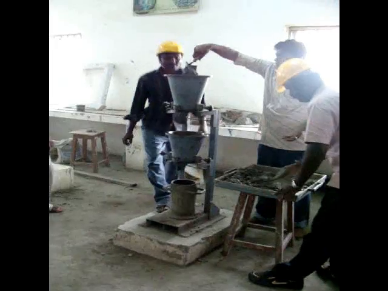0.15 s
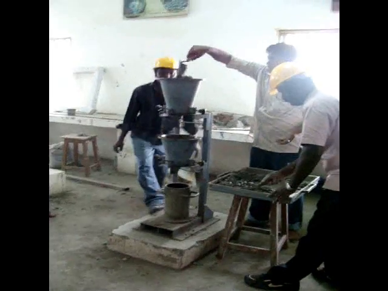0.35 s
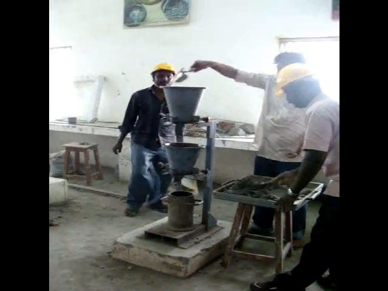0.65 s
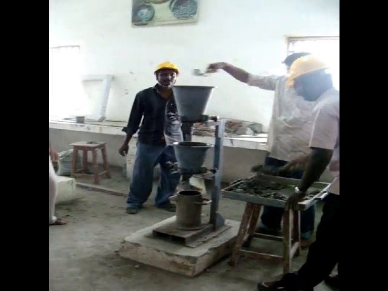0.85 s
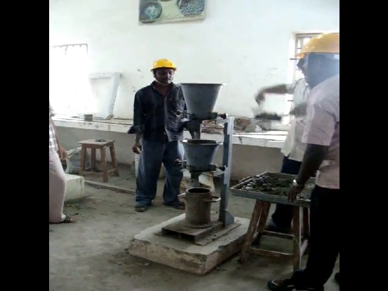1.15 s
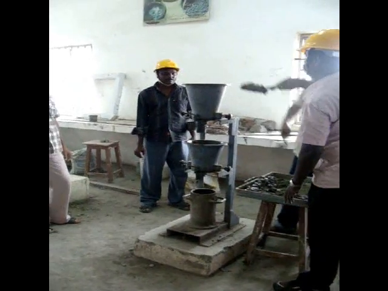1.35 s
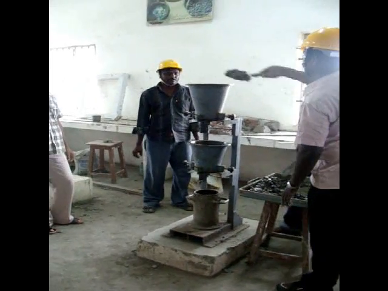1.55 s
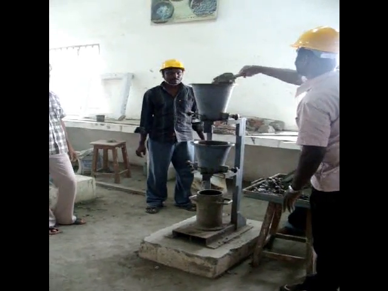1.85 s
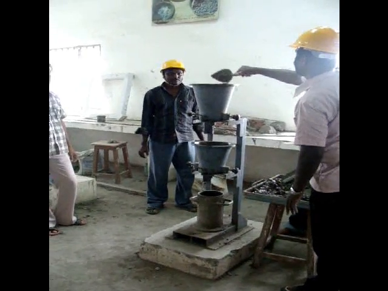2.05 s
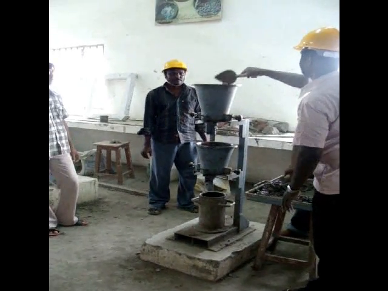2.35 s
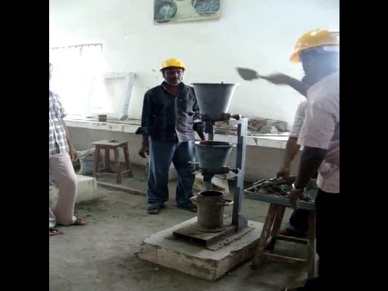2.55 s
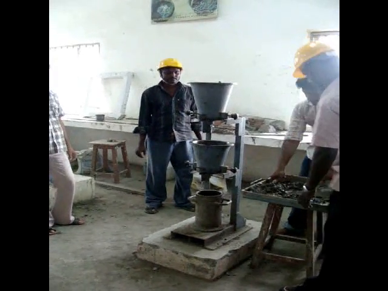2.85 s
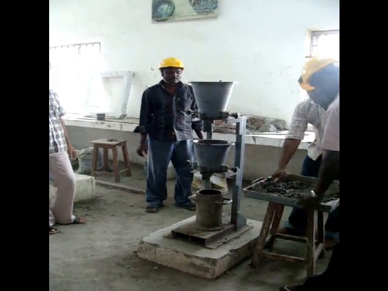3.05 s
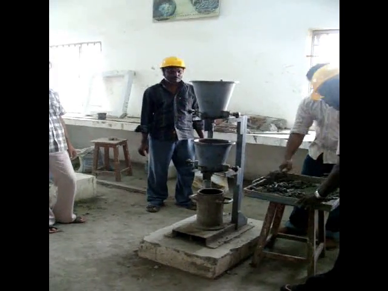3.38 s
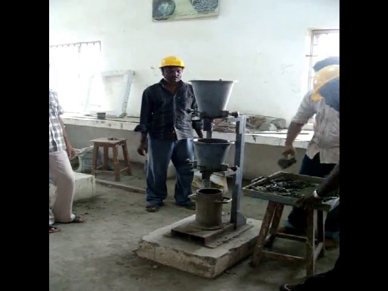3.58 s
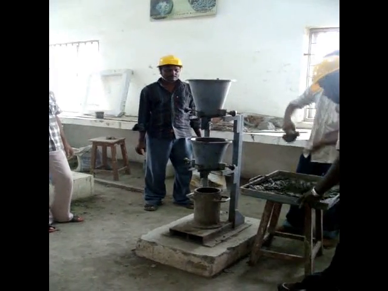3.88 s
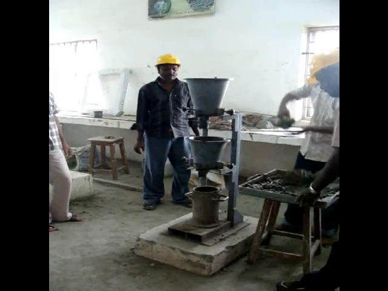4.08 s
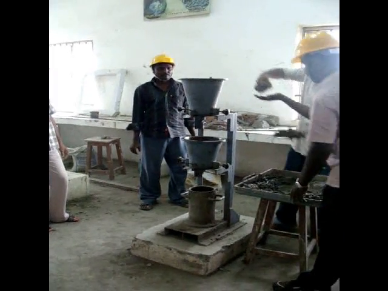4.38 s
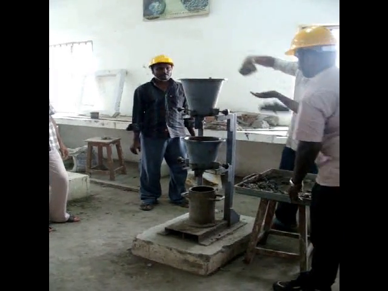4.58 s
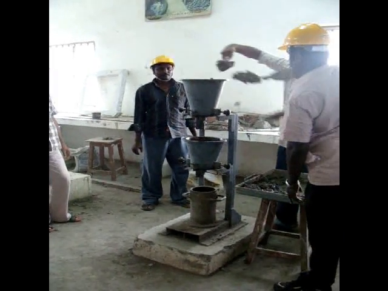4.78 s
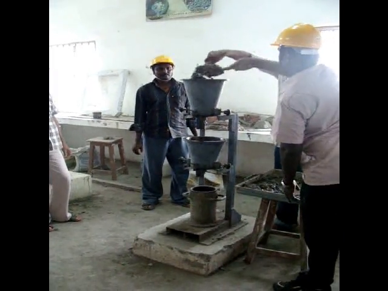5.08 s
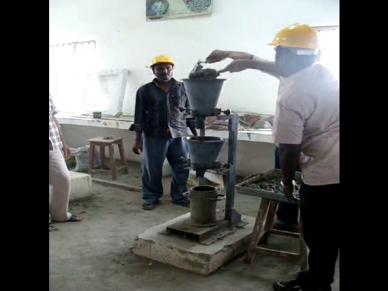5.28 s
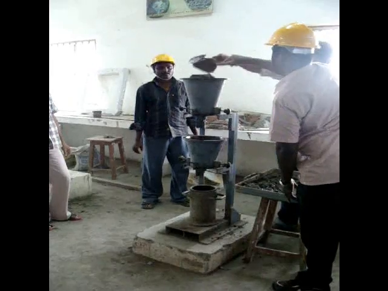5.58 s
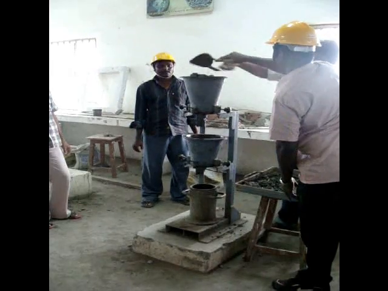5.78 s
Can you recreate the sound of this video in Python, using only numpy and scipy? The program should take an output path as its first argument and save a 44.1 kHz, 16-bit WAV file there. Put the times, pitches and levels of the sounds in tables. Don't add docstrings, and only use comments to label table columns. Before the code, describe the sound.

A steel scoop scrapes gritty wet gravel on a metal tray, with sharp knocks and clanks ringing in a bare, echoing lab.

```python
import sys
import numpy as np
from scipy import signal
from scipy.fft import rfft, irfft, next_fast_len
from scipy.io import wavfile
from scipy.ndimage import map_coordinates

SR = 44100
rng = np.random.default_rng(int(sys.argv[2]) if len(sys.argv) > 2 else 0)


def invert_db(x):
    u = np.asarray(x, float) / 20
    return 10 ** u


def master(y):
    cut = np.clip(np.atleast_2d(y).T, -1, 1)
    pcm = np.round(cut * 32767)
    wavfile.write(sys.argv[1], SR, pcm.astype(np.int16))


N = 261336


def unit(x):
    return x / np.sqrt(np.mean(x ** 2) + 1e-20)


def along(points, hz):
    f, v = np.transpose(points)
    return np.interp(np.log(hz + 1), np.log(f + 1), v)


def filtered(x, response):
    m = next_fast_len(len(x) + 8192)
    hz = np.fft.rfftfreq(m, 1 / SR)
    return irfft(rfft(x, m) * response(hz), m)[:len(x)]


def resonances(modes):
    def response(f):
        total = 0
        for k, (centre, width, db) in enumerate(modes):
            band = 1j * f * width
            total = total + (-1) ** k * invert_db(db) * band / (centre * centre - f * f + band)
        return total
    return response


# frequency in Hz, level in dB per Hz.
STILL_AIR_COLOUR = [(15, -34), (30, 2), (90, -27.5), (400, -11), (1690, -13), (10000, -48), (13000, -67),
                    (22000, -120)]
# time in seconds, level in dB.
RUMBLE_LEVEL = [
    (0.0, -34),
    (0.56, -54),
    (0.98, -41.5),
    (1.61, -47.5),
    (2.38, -39.5),
    (3.25, -43),
    (3.93, -52.5),
    (5.9, -53.5),
]
# frequency in Hz, level in dB per Hz.
RUMBLE_COLOUR = [(20, -30), (40, -3), (120, -11), (300, -8), (600, -47), (22000, -120)]


def air():
    def noise(colour):
        return unit(filtered(rng.standard_normal(N), lambda f: invert_db(along(colour, f))))

    s, db = np.transpose(RUMBLE_LEVEL)
    rumble_db = np.interp(np.arange(N) / SR, s, db) - 7
    return invert_db(-43) * noise(STILL_AIR_COLOUR) + invert_db(rumble_db) * noise(RUMBLE_COLOUR)


# frequency in Hz, t60 in seconds.
LAB_DECAY = [(150, 0.76), (500, 1.63), (2000, 1.266), (6000, 0.97), (10000, 0.65)]


def lab(x):
    out, step = np.zeros(N + 3 * SR), SR // 4
    for start in range(0, N, step):
        hz, t, z = signal.stft(rng.standard_normal(SR + SR // 4), SR, nperseg=256)
        decay = invert_db(-60 * t / along(LAB_DECAY, hz)[:, None])
        tail = signal.istft(z * decay, SR, nperseg=256)[1]
        age = np.arange(len(tail)) / SR
        tail = tail * (1 - np.exp(-age / 0.0042)) * (1 + 0.92 * np.exp(-age / 0.024))
        wet = signal.fftconvolve(x[start:start + step], tail / np.linalg.norm(tail))
        out[start:][:len(wet)] += wet
    return out[:N]


# time in seconds, level in dB.
STAND_THUDS = [
    (0.16, -5),
    (2.369, -16),
    (3.264, -18),
    (4.4, -8),
    (4.964, -20),
    (5.338, -8),
]


def thuds():
    out = np.zeros(N + SR)
    u = np.arange(SR // 5) / SR / 0.018
    push = np.e * u * np.exp(-u)
    for s, db in STAND_THUDS:
        out[round(s * SR):][:len(u)] += invert_db(db) * push
    return out[:N]


def ringing(modes, blows, flutter_hz):
    out, t = np.zeros(N + SR), np.arange(SR) / SR
    onset = np.clip(t / 0.00068, 0, 1)
    for s, db in blows:
        for hz, level_db, t60 in modes:
            knots = rng.standard_normal((2, SR // 80))
            rate_hz = min(flutter_hz * np.sqrt(hz / 1000), 500)
            a, b = (map_coordinates(k, [t * rate_hz], order=1) for k in knots)
            mode = (0.5 + a) * np.sin(2 * np.pi * hz * t) + b * np.cos(2 * np.pi * hz * t)
            out[round(s * SR):][:SR] += invert_db(db + level_db - 60 * t / t60) * mode * onset
    return out[:N]


# frequency in Hz, level in dB, t60 in seconds.
STOOL_MODES = [(341, -8.5, 0.44), (420, -11.5, 0.21), (794, 4.5, 0.038), (980, -5, 0.055),
               (1460, -11, 0.45), (1630, -6, 0.22)]
# time in seconds, level in dB.
STOOL_BLOWS = [
    (2.598, -23),
    (3.174, -18),
    (3.192, -21),
    (3.216, -18),
]


def stool():
    return ringing(STOOL_MODES, STOOL_BLOWS, flutter_hz=50)


# frequency in Hz, level in dB, t60 in seconds.
TIP_MODES = [(5700, 5, 0.087), (7960, 4, .08), (10100, -18, 0.18)]
# time in seconds, level in dB.
TIP_BLOWS = [
    (5.093, -32.5),
    (5.254, -29),
]


def blade_tip():
    return ringing(TIP_MODES, TIP_BLOWS, flutter_hz=160)


# frequency in Hz, level in dB, t60 in seconds.
BLADE_MODES = [(1367, -18, 0.21), (2940, -5, 0.093), (3250, -5, 0.12), (3500, 0.5, 0.091),
               (3770, -1.5, 0.075), (4330, -16, .04), (7620, -6.5, 0.12)]
# time in seconds, level in dB.
BLADE_BLOWS = [
    (4.965, -17),
]


def blade():
    return ringing(BLADE_MODES, BLADE_BLOWS, flutter_hz=150)


# frequency in Hz, level in dB, t60 in seconds.
HOPPER_MODES = [(272, -19, 1.34), (623, -22, 1.7), (815, -13.5, 0.58), (1050, -21.5, 1), (1500, 0, 0.28),
                (1540, -4, 0.43), (1620, -8, 0.85), (1850, -14, 0.79), (2039, 1, 0.19), (2121, -5.5, 0.58),
                (2190, -4, 0.38), (2640, -1, 0.49), (3295, -7.5, .65),
                (3950, -17, .25), (4145, -12, 0.93), (4610, -10, 0.7), (4730, -1.5, 0.26), (4870, -4, .55),
             (5500, -3, .4), (5870, -6, .35), (6400, -7, .35), (7079, -10, .22)]
# time in seconds, level in dB.
HOPPER_BLOWS = [
    (5.34, -16.5),
]


def hopper():
    return ringing(HOPPER_MODES, HOPPER_BLOWS, flutter_hz=85)


# time in seconds, peak in dB, ring in Hz, room share in dB, hardness in dB.
STONE_KNOCKS = [(0.6236, -15, 1430, 0, -0.5), (0.7116, -11.5, 3800, -8, 1.5),
                (0.7788, -15.5, 942, -1, -5.5), (0.8196, -31, 1420, 12, -2),
                (0.8597, -9.5, 1880, -2.5, -1.5), (0.9178, -11.5, 2140, -12, 2),
                (1.251, -23.5, 2850, -1, -1), (1.3555, -6.5, 3400, -4.5, 2), (1.3844, -16, 970, -4.5, -5),
                (1.7695, -14, 4300, -5, 2), (2.8641, -3.5, 1540, -7, 2.5), (2.9781, -5.5, 1180, -2.5, -3),
                (3.1748, -10, 800, 6, -5.5), (3.1895, -2.5, 1665, -6.5, 0), (4.0008, -34, 1260, 9.5, -1),
                (4.2825, -19.5, 900, 0.5, -1.5), (4.3997, -5, 3550, 5, 2.5), (4.9631, -10.5, 3500, -6.5, 5)]
EDGE_TICKS = [(0.0685, -9, 940, 2.5, 2), (1.2878, -25.5, 3490, -1, 2), (1.8394, -35, 1400, 13, 1),
              (2.1692, -5, 2480, -4, 6), (3.2632, -3, 3760, 1.5, 0.5), (4.083, -25, 5530, -4.5, 6),
              (4.121, -36, 4600, -9, 0), (4.263, -28.5, 4400, -9, 4), (5.0934, -18, 5700, -4.5, -2),
              (5.1438, -15.5, 3050, 1.5, 2.5), (5.2535, -7.5, 3900, -3.5, 7.5), (5.339, -15, 2280, 15, 5),
              (5.7303, -22, 7000, 2.5, 9)]
PADDED_BUMPS = [(0.5205, -6.5, 4470, -3, -2.5), (1.2126, -29, 1570, -9, -6), (1.915, -20, 2680, -17, 5),
                (1.9614, -8, 2640, -21, 3), (2.0396, -6, 2600, 1.5, 0), (2.4989, -11, 3450, -19, -5),
                (2.6384, -8, 1020, 4, -14.5), (2.7311, -13, 1000, 5, -12.5), (3.1, -21, 1310, -17, 3),
                (3.5776, -18.5, 3310, -1, 0), (3.8702, -25.5, 1290, 6, -4.5)]
NARROW_TAPS = [
    (1.4725, -14, 2190, -12.5, 0),
    (2.265, -5, 1300, -2.5, 0),
    (2.366, -1.5, 1170, -12, 1),
    (2.4334, -8, 1000, -1, -1.8),
    (5.7869, -16, 1850, -3, -0.9),
]
# low in dB, treble in dB, ring in dB.
CONTACT_COLOURS = [(-5.5, -3, -4), (-12, -5.5, 1), (-9.5, -7, 3.5), (-5, -19, 8.5)]


def knocks():
    near, far, t = np.zeros(N + SR), np.zeros(N + SR), np.arange(SR // 10) / SR
    tables = STONE_KNOCKS, EDGE_TICKS, PADDED_BUMPS, NARROW_TAPS
    rows = [(*row, *colour) for table, colour in zip(tables, CONTACT_COLOURS) for row in table]
    for s, db, hz, room_db, hard_db, low_db, treble_db, ring_db in rows:
        tilt = [(786, 650, low_db - hard_db + 6.5),
                (3080, 2880, 2.23),
                (7100, 8100, treble_db + hard_db - 0.5)]
        burst = rng.standard_normal(len(t)) * invert_db(-60 * t / 0.029) * (1 - np.exp(-t / 0.00039))
        crack = filtered(burst, resonances(tilt + [(hz, 400, ring_db + 8)]))
        body, ring = resonances(tilt), resonances([(hz, 550, ring_db - 3)])
        push = filtered(1.0 * (t == 0), lambda f: body(f) + ring(f))
        i = round(s * SR)
        near[i:][:len(t)] += invert_db(db + 2.5) * crack / np.abs(crack).max()
        far[i:][:len(t)] += invert_db(db + room_db + 22) * push / np.linalg.norm(push)
    return near[:N], far[:N]


def all_knocks():
    return STONE_KNOCKS + EDGE_TICKS + PADDED_BUMPS + NARROW_TAPS


def jolts():
    hits = np.zeros(N)
    for s, db, *_ in all_knocks():
        hits[round(s * SR)] = invert_db(db - 9)
    return signal.lfilter([1], [1, -np.exp(-1 / (0.045 * SR))], hits)


def gravel(per_second, spread_db, life, smooth):
    size_db = spread_db * np.minimum(rng.exponential(1, N), 2.3)
    starts = (rng.random(N) < per_second / SR) * invert_db(size_db)
    bursts = signal.lfilter([1], [1, -invert_db(-60 / (life * SR))], starts)
    return unit(bursts) + smooth


# time in seconds, force in dB, speed in dB.
DIG_STROKES = [
    [(0.0, -7.5, -3), (0.024, -25, 1.5), (0.132, -10, 1), (0.212, -11, -1), (0.372, -17, -0.5),
     (0.46, -19.5, -17)],
    [(3.255, -49, -1), (3.266, -12.5, 4), (3.492, -18.5, -0.5), (3.506, -11, -5), (3.6, -19.5, -8)],
]
# time in seconds, force in dB, speed in dB.
DRAG_STROKES = [
    [(1.922, -17, -4), (1.95, -18, -3.5), (2.029, -13.5, 2.5), (2.09, -13, -3), (2.153, -9, -6.5),
     (2.33, -19.5, 3.5)],
    [(2.33, -29, 14), (2.376, -15.5, 5), (2.472, -13, -1.5), (2.606, -35, 11), (2.62, -10, 9)],
    [(2.62, -23.5, 8.5), (2.704, -25.5, 4.5), (2.738, -16.5, 3), (2.92, -22, -1.5), (2.964, -15.5, -36),
     (3.0, -29, -5)],
]
# frequency in Hz, width in Hz, level in dB.
HEAP_BOOM = [(354, 76, -3.5), (663, 280, -2), (1400, 600, 1.5)]
HEAP_CRUNCH = [(2000, 680, 6.5), (3660, 1440, 5)]
TRAY_BOOM = [(390, 32, -5.5), (660, 320, -10), (1170, 530, -1.5)]
BLADE_CRUNCH = [(1730, 1170, 5.5), (2380, 490, 14), (3500, 1400, 6)]
JOLTED_FLOOR = [(1010, 226, -0.5), (1300, 205, 1.5), (1550, 190, -3)]
# frequency in Hz, level in dB.
GRIT_COLOUR = [(2500, -30), (4500, -0.5), (6000, 1), (8000, -1.5), (10000, -6)]


def strokes():
    t, stones = np.arange(N) / SR, gravel(per_second=250, spread_db=4.5, life=0.016, smooth=0.39)

    def sound(body):
        return unit(filtered(stones * rng.standard_normal(N), body))

    grit = sound(lambda f: invert_db(along(GRIT_COLOUR, f)))
    dig = DIG_STROKES, sound(resonances(HEAP_CRUNCH)), sound(resonances(HEAP_BOOM)), 0, 1
    drag = DRAG_STROKES, sound(resonances(BLADE_CRUNCH)), sound(resonances(TRAY_BOOM)), -2, -3.5
    jolt = jolts() * sound(resonances(JOLTED_FLOOR))
    average_db = -17
    out = np.zeros(N)
    for table, crunch, boom, boom_db, grit_db in (dig, drag):
        for rows in table:
            s, force, speed = np.transpose(rows)
            edge = np.clip(np.minimum(t - s[0] + 0.014, s[-1] - t) / 0.021, 0, 1)
            force_db, speed_db = np.interp(t, s, force), np.interp(t, s, speed)
            low_db = average_db + boom_db + 0.33 * (force_db - average_db) - 0.12 * speed_db
            low = invert_db(low_db) * boom + jolt
            high = invert_db(force_db) * (crunch + invert_db(grit_db + speed_db) * grit)
            out += edge * invert_db(-5.5) * (high + low)
    return out


def scene():
    scrape, (cracks, pushes) = strokes(), knocks()
    steel = hopper() + blade() + blade_tip() + stool()
    send = filtered(invert_db(0.5) * scrape + pushes, lambda f: (1j * f / (277 + 1j * f)) ** 2)
    mono = scrape + cracks + steel + thuds() + lab(send + invert_db(-1.5) * steel) + air()
    return np.array([mono, mono])


def attacks():
    return np.sort([row[0] for row in all_knocks()])


def patchy(x, share, depth_db):
    hz, t, z = signal.stft(x, SR, nperseg=256)
    since = t[:, None] - attacks()
    busy = ((since > 0.008) & (since < 0.06)).any(axis=1)
    coarse = rng.random((len(hz) // 5 + 1, len(t) // 3 + 1))
    patches = np.kron(coarse, np.ones((5, 3)))[:len(hz), :len(t)]
    lost = (patches < share) & busy & (hz[:, None] > 4500)
    return signal.istft(z * invert_db(depth_db * lost), SR, nperseg=256)[1][:N]


def gapped(x):
    grid_s, grid_start_s = 0.036, 0.0105
    x, treble, span = x.copy(), filtered(x, lambda f: f > 4000) ** 2, SR // 100
    for s in attacks():
        i, end = round(s * SR), s - 0.0022
        start = s - (s - grid_start_s) % grid_s
        after, before = treble[i:i + span].mean(), treble[i - 2 * span:i - span // 2].mean()
        rise_db = 10 * np.log10(after / before)
        near = slice(max(i - 10 * span, 0), i)
        t = np.arange(near.start, i) / SR
        gate = np.clip(np.minimum(t - start, end - t) / 0.00033, 0, 1)
        edge_hz = 6800 * 0.5 ** (rise_db / 19.5)
        lost = filtered(x[near] * (t < end), lambda f: f > edge_hz)
        depth_db = 1.2 * max(rise_db - 6.5, 0)
        x[near] -= (1 - invert_db(-depth_db)) * gate * lost
    return x


def band_limit(x):
    return signal.sosfilt(signal.butter(12, 16820, fs=SR, output="sos"), x)


# frequency in Hz, level in dB.
MIC_COLOUR = [(25, -22), (150, 6.5), (500, 0), (1500, -1), (5000, 1), (9900, -2)]


def record(dry):
    x = filtered(dry[0], lambda f: invert_db(along(MIC_COLOUR, f)))
    x = x / (1 + np.abs(x / 1.05) ** 5) ** (1 / 5)
    x = x + 0.57 * filtered(x ** 4, lambda f: 1 / (1 + 1j * f / 30))
    x = filtered(x, lambda f: (f < 10000) & (f > 15))
    x = gapped(patchy(x, share=0.12, depth_db=-22))
    x = signal.resample_poly(x, 320, 441)[np.arange(N) * 320 // 441]
    x = filtered(x, lambda f: f < 15900)
    return band_limit(np.array([x, x]))


dry = scene()
out = record(dry)
master(out)
```